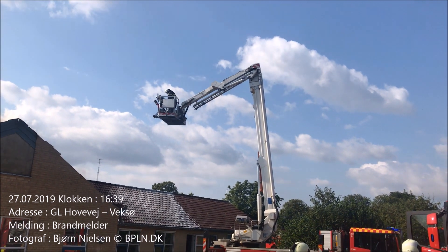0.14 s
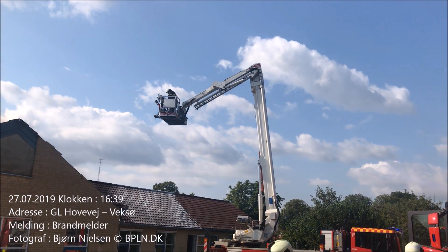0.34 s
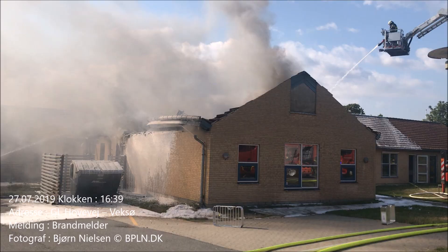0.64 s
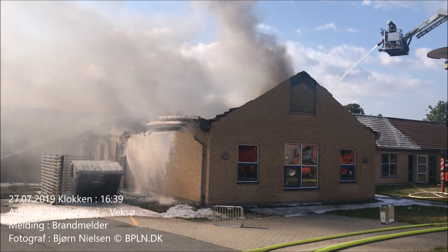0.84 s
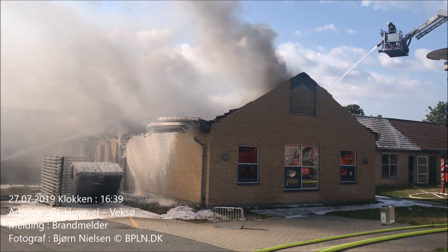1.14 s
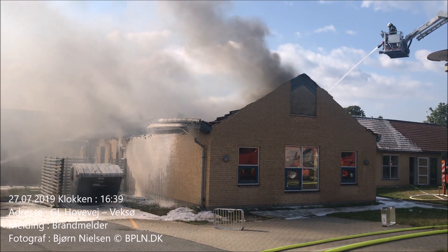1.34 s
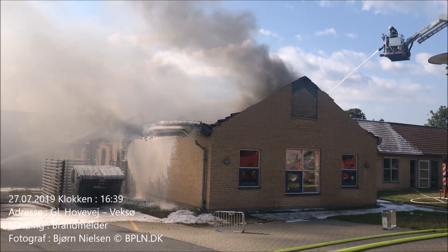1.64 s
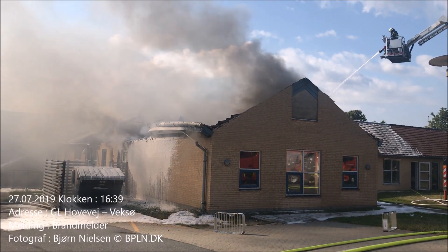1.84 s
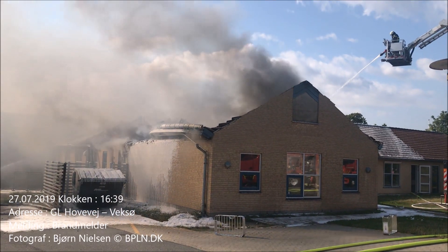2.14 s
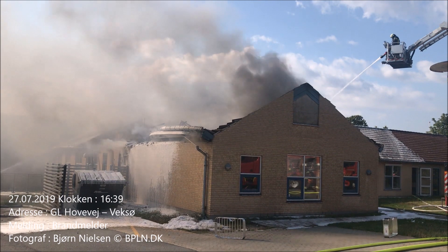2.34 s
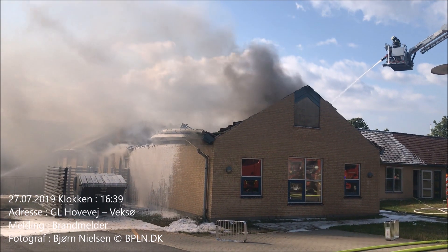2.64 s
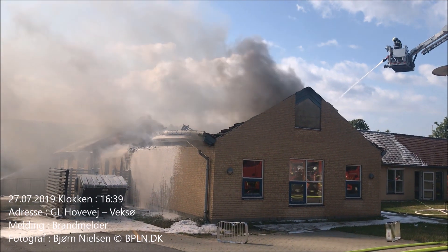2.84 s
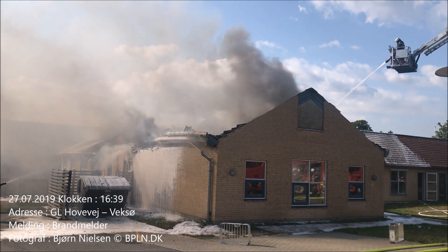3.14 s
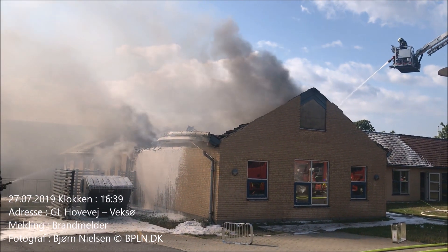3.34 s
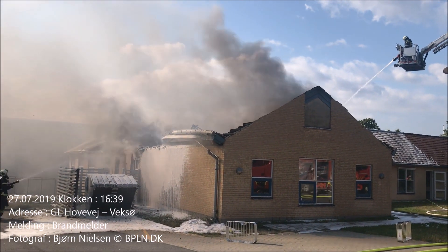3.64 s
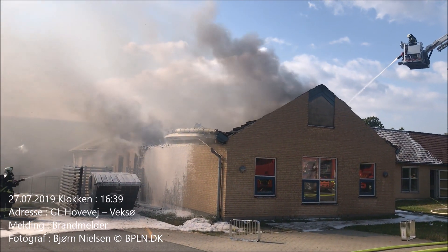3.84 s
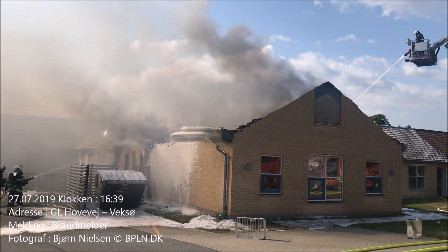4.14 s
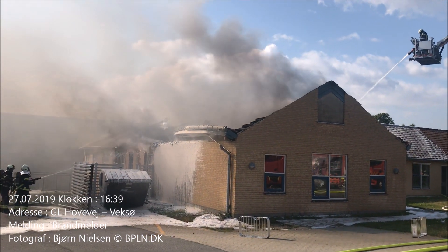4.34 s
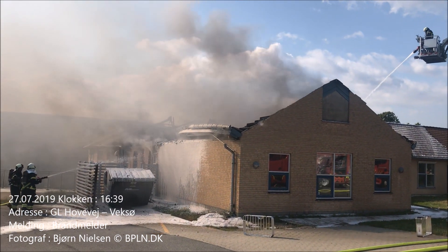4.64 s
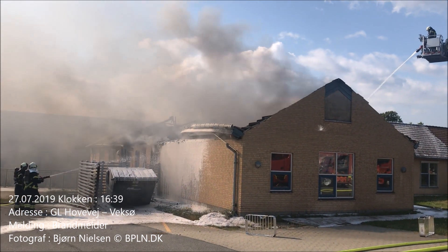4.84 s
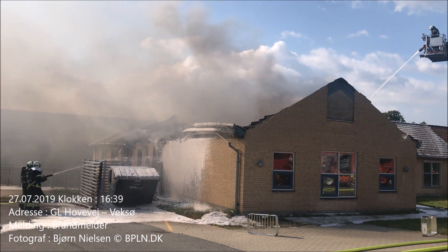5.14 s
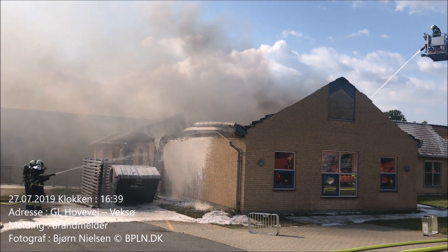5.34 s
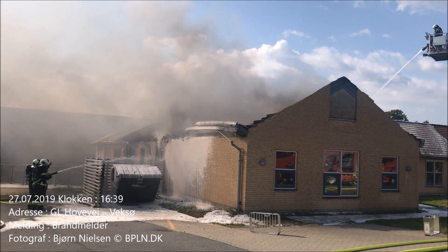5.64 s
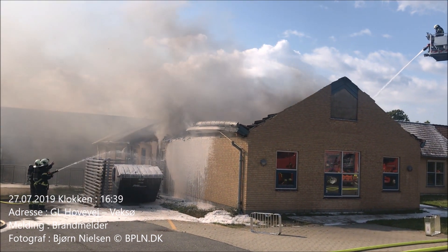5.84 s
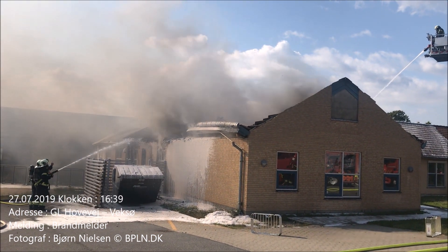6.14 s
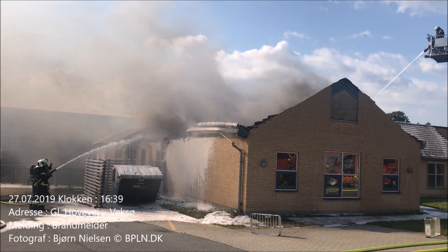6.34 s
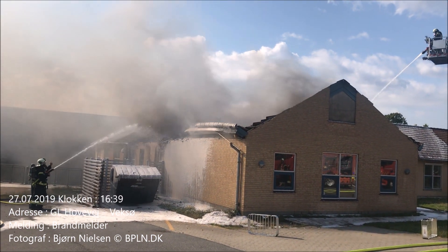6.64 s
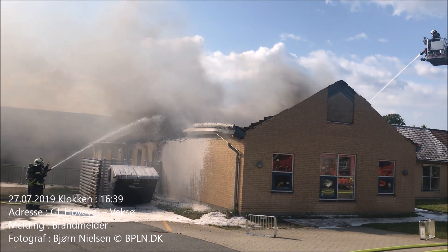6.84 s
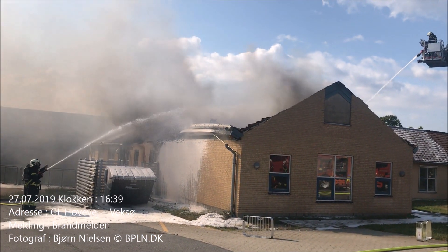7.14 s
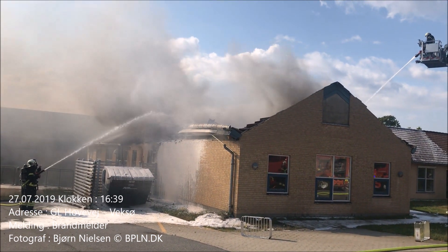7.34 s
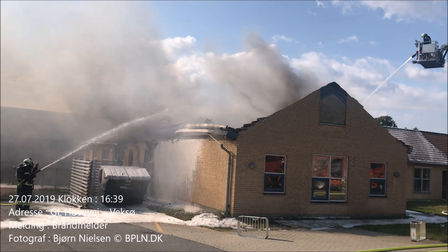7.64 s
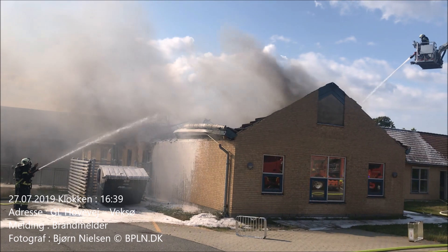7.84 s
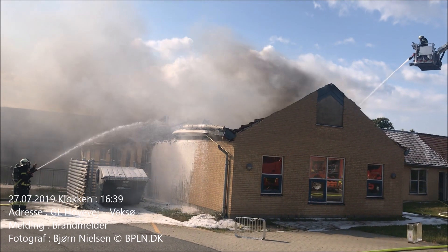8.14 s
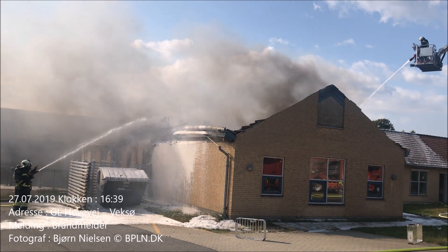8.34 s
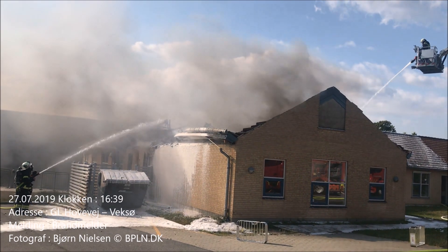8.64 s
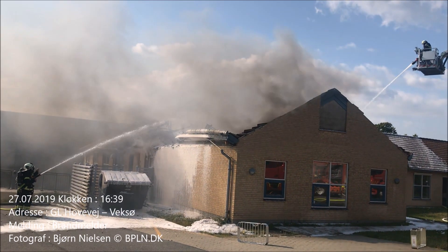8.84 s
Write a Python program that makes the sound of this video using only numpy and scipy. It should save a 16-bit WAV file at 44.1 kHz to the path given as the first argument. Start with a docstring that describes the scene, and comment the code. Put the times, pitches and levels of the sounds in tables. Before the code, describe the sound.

A diesel engine idles and fire pumps drone over a low, fluttering roar throughout, outdoors at a house fire. At first the microphone is beside an aerial ladder truck, whose nozzle sizzles over a faint hydraulic whine and an engine growl. At about 0.7 seconds the sound drops out for an instant and resumes by the house. A hose jet hisses steadily with fine, bright spray, its tone shifting slightly as the nozzle moves, while water lands with a hollow gush. A pump engine revs briefly and sags back several times between 1 and 5.5 seconds. Heavier water slaps down softly near 2.5 and 4.4 seconds. Just past 4 seconds the gush gives way to open splashing and the hiss eases a little. Hiss, splashing and engine throb continue until about 9 seconds, with the pump hum stronger around 7 to 8 seconds.

```python
"""A house fire being fought outdoors, heard on one microphone from two places. First, beside the aerial
ladder: its hydraulic pump whines and its nozzle sizzles. After a brief break at 0.7 s, by the house:
a hose jet hisses, coloured by its bounce off the paving as the nozzle moves, and water gushes hollowly.
Just past 4 s the water swings onto another surface and splashes in the open. Behind it all, a
six-cylinder diesel idles and pumps drone and rev over a low roar."""
import sys
import numpy as np
from scipy import signal
from scipy.fft import rfft, irfft
from scipy.io import wavfile
from scipy.ndimage import uniform_filter1d, map_coordinates

SR = 44100
rng = np.random.default_rng(int(sys.argv[2]) if len(sys.argv) > 2 else 0)


def wav_record(signal):
    """Record a signal, one row per channel, as 16-bit PCM in the file named by sys.argv[1]."""
    frames = np.transpose(np.atleast_2d(signal))
    bounded = np.clip(frames, -1, 1)
    # unit amplitude maps onto the largest positive 16-bit level
    quanta = np.round(bounded * 32767).astype(np.int16)
    wavfile.write(sys.argv[1], SR, quanta)


N = 396900
T = np.arange(N) / SR
BREAK_FROM_S, BREAK_TO_S = 0.7125, 0.7615
FIRING_HZ = 30.01

# spectra of the hose jet and of its fine spray: frequency_hz, relative_db
JET_SPECTRUM = [(500, -44), (1400, -1.5), (2050, -3.5), (2380, 3), (2700, 3.5), (3200, 0), (4000, 2.5),
                (4800, -.5), (5500, -0.5), (6300, -2), (7200, -4.5), (7800, -18), (9000, -17), (15500, -60)]
SPRAY_SPECTRUM = [(3000, -11), (6500, -2), (8000, 0), (9000, -0.5), (9800, -2.5), (10400, -8), (11400, -8),
                  (12500, -11.5), (14000, -17), (16000, -28)]
# the jet's hiss and the spray as the hose is moved about: time_s, relative_db
HISS_LEVEL = [(0.8, -25), (1.3, -26), (2.27, -25), (2.36, -23.5), (2.57, -23.5), (2.63, -25), (3.6, -25),
              (4.63, -31), (5.83, -28.5), (5.94, -31), (6.3, -28), (7.91, -28), (8.22, -30), (8.9, -28.5)]
SPRAY_LEVEL = [(0.78, -43.5), (0.87, -42.5), (1.41, -48.5), (2.39, -45), (3.24, -50.5), (3.39, -45.5),
               (4.51, -52.5), (5.67, -51), (5.7, -52), (7.9, -47), (8.06, -50.5), (8.95, -49.5)]
# how late the bounce off the paving reaches the microphone: time_s, lag_ms
BOUNCE_LAG = [(.3, .594), (.7, .61), (1.5, .602), (1.7, .638), (2.4, .66), (2.8, .657), (3.2, .69),
              (5, .702), (5.8, .724), (6.02, .795), (6.7, .853), (7.4, .813), (9, .765)]
# how much of the sound bounces: time_s, jet_share, spray_share
BOUNCE_SHARES = [(.8, 0.4, 0.2), (1.8, 0.2, 0.35), (2.6, 0.32, 0.4), (3.5, 0.4, 0.1), (4.5, 0.4, 0.4),
                 (5.6, 0.28, 0.2), (5.95, 0.3, .08), (6.5, 0.58, 0.4), (7.4, 0.62, 0.33), (9, 0.43, .22)]
# hollow resonances of the gush: centre_hz, width_hz, relative_db
GUSH_MODES = [(597, 120, 3), (674, 84, -2), (940, 150, -8.5), (1764, 180, -3.5)]
# spectrum of the splash: frequency_hz, relative_db
SPLASH_SPECTRUM = [(200, -4.5), (400, 2.5), (800, -7.5), (1100, 1.5), (1400, 0), (1800, -1), (2100, -6),
                   (3000, -10), (6000, -18), (12000, -56)]
# heavier sheets of water slap down: middle_s, half_length_s, level_db
SLAPS = [(2.52, 0.097, -35), (4.44, 0.014, -29.5)]
# sizzle of the ladder's nozzle: frequency_hz, relative_db
NOZZLE_SPECTRUM = [(1000, 1), (2200, -2.5), (2600, 0), (3600, 3.5), (5000, 2.5), (5700, 2.5), (6500, 4.5),
                   (7200, -1), (7750, -5), (8500, -2), (9200, -10), (9800, -13.5), (12000, -22.5),
                   (15500, -37)]
# overtones of the ladder's hydraulic pump: multiple, level_db
HYDRAULIC_WHINES = [(6, -49), (7, -47), (8, -45), (9, -44.5), (10, -48)]
# resonances of the ladder truck's bodywork: centre_hz, width_hz, relative_db
BODYWORK_MODES = [(268, 95, 0.5), (614, 38, -2.5), (692, 28, -0.5), (790, 46, -7)]
# how hard each cylinder knocks, in firing order: relative_db
CYLINDER_KNOCKS = [1.2, -1.2, 1, -1.5, 1.2, -.7]
# resonances of the engine block: centre_hz, width_hz, relative_db
BLOCK_MODES = [(523.5, 86, 3.5), (687.4, 23.5, 3), (912, 96, 0), (969.5, 86, 1.5), (1470, 550, -12.5)]
# tones of the engine block: firing_multiple, level_db
BLOCK_TONES = [(17.5, -48.5), (18.5, -50), (19.5, -52), (31, -51), (33, -53)]
# the exhaust note: firing_multiple, relative_db
EXHAUST_ORDERS = [(1, -19), (2, -1.5), (4, -20), (5, -12)]
# strength of the exhaust throb: time_s, exhaust_db, third_order_db
THROB_LEVEL = [(.75, -38, -50), (1.15, -31, -29), (1.6, -32, -30), (2.1, -24, -36), (2.45, -36, -39),
               (2.8, -23.5, -43), (3.25, -29, -39), (3.5, -26.5, -32), (4.1, -34, -33), (4.9, -29.5, -36),
               (5.3, -32, -34), (5.6, -26.5, -42), (5.95, -32, -42), (6.4, -30, -40), (7, -33, -42),
               (7.6, -27.5, -42), (8.5, -28.5, -40), (8.8, -24.5, -41)]
# the pump's hum: time_s, level_db
HUM_LEVEL = [(0, -47), (1.3, -43), (2.7, -46), (5, -44), (6.3, -41), (7, -37.5), (8.2, -37), (8.5, -43)]
# a pump engine revs and sags back: top_s, run_up_s, top_hz, third_order_db, second_order_db
REVS = [(1.1, .26, 228, -30.5, -40), (1.89, .86, 233, -29, -35), (2.28, .16, 225, -35, -40),
        (2.55, .2, 227, -34, -38), (4.06, .25, 226, -37, -42), (4.47, .52, 225, -32.5, -38),
        (4.97, .42, 219, -32, -34), (5.33, .4, 231, -40, -31.5)]
# spectrum of the roar: frequency_hz, relative_db
ROAR_SPECTRUM = [(20, -28), (36, -14), (46, -5.5), (75, 0.5), (110, -0.5), (150, -2), (190, -8), (230, -6),
                 (262, -14), (300, -10.5), (345, -22.5), (500, -32), (800, -21.5), (2000, -60)]
# swells and lulls of the deep roar: middle_s, half_length_s, change_db
ROAR_SWELLS = [(.12, .025, 6), (.34, .05, -6), (.48, .04, 7), (.61, .04, -9), (1.22, 0.07, 4),
               (2.14, .1, 2), (2.38, .04, 7), (3.24, .1, -3), (3.45, 0.06, 5), (3.88, .08, -5),
               (4.28, .05, 1.5), (4.37, .03, -5), (4.57, .08, 1.5), (4.81, .02, 3), (4.9, 0.03, 6),
               (5.36, .035, -7), (5.55, 0.054, 2), (6.55, .04, 3.5), (6.7, .2, 2), (7.85, .1, 0.5),
               (8.25, 0.11, 1), (8.53, .035, -7), (8.63, .05, 4.5), (8.88, .1, 1)]
# echoes off the house walls: lag_ms, relative_db
WALL_ECHOES = [(4.7, -15), (11.3, -14), (19.9, -15)]


def hose(hiss_db, lag_ms):
    """By the house: the jet breaks into spray and mist, heard directly and off the paving."""
    surge = walk(33)
    jet = colour(noise(), JET_SPECTRUM) * undb(hiss_db - 0.75 + 0.63 * surge)
    # a bright edge on the hiss, until the nozzle is moved
    jet += band(hz=4820, width_hz=1700) * undb(-34) * (1 - fade(middle_s=2, length_s=0.89))
    spray = colour(drops(per_s=36000, spread_db=1.8), SPRAY_SPECTRUM)
    spray *= undb(curves(SPRAY_LEVEL)[0] + 8.5 + 0.5 * surge + walk(16))
    mist = band(hz=7600, width_hz=1400) * undb(-40) * (1 - fade(middle_s=2.85, length_s=0.28))
    jet_share, spray_share = curves(BOUNCE_SHARES)
    wobble_ms = 0.003 * walk(5)  # the jet wobbles in the firefighter's hands
    bounced = delayed(jet_share * jet + spray_share * (spray + mist), lag_ms + wobble_ms)
    return jet + spray + mist + bounced


def falling_water(hiss_db):
    """Water lands on the house: a hollow gush, giving way to a splash as it swings to another surface."""
    swung = fade(middle_s=4.16, length_s=0.097)
    gush_db = by_place(at_ladder=-37.5, at_house=-34.5 - 12 * swung)
    splash_db = by_place(at_ladder=-50, at_house=(1 - swung) * (hiss_db - 9) - 31 * swung)
    gush = ring(noise(), GUSH_MODES) * undb(gush_db + 0.6 * walk(5.3))
    splash = colour(drops(per_s=7500, spread_db=1.56), SPLASH_SPECTRUM)
    splash *= undb(splash_db + 1.15 * walk(15))
    slaps = band(hz=1460, width_hz=700) * bumps([(s, half_s, undb(db)) for s, half_s, db in SLAPS])
    return gush + splash + slaps


def ladder_truck(lag_ms, pump_hz=224, bounce_share=0.17):
    """Close by: the hydraulics whine, the engine growls, the nozzle sizzles and gains a bounce as it turns."""
    whines = sum(undb(db) * band(k * pump_hz, width_hz=45) for k, db in HYDRAULIC_WHINES)
    throb = orders(FIRING_HZ * T, [(1, -34), (2, -34)], waver_db=0.5)
    growl = ring(noise(), BODYWORK_MODES) * undb(-35)
    turned = fade(middle_s=0.4, length_s=0.25)
    nozzle = colour(noise(), NOZZLE_SPECTRUM) * undb(-27 + 1.06 * walk(24.7))
    mist = band(hz=8800, width_hz=900) * undb(-40) * (1 - turned)
    bounced = bounce_share * turned * delayed(nozzle, lag_ms)
    return whines + throb + growl + mist + nozzle + bounced


def diesel(exhaust_db, third_db, knock_db=-34, decay_s=0.024, cylinders=6):
    """Cylinders fire in turn, each knock ringing the block; the exhaust throbs below."""
    firings = np.cumsum(FIRING_HZ * (1 + 0.00067 * walk(1.48))) / SR
    strength = undb(CYLINDER_KNOCKS)[firings.astype(int) % cylinders]
    blow = strength * np.exp(-(firings % 1) / FIRING_HZ / decay_s)
    # the same parts clatter alike in every engine cycle, with chance on top
    cycle_s = (firings % cylinders) / FIRING_HZ
    clatter = np.interp(cycle_s, T, noise()) + 1.87 * noise()
    knock = ring(blow * clatter, BLOCK_MODES) * undb(knock_db)
    third = orders(firings, [(3, 0)], waver_db=-0.5) * undb(third_db)
    block = orders(firings, BLOCK_TONES, waver_db=2.5)
    exhaust = orders(firings, EXHAUST_ORDERS, waver_db=1.2) * undb(exhaust_db)
    return knock + third + block + exhaust


def pumps():
    """A steady hum, a rough drone that is louder by the ladder, and an engine revving now and then."""
    hum = tone(hz=268.8, wander=.0005, flutter_db=.5) * undb(curves(HUM_LEVEL)[0])
    drone = tone(hz=220.8, wander=.012, flutter_db=1)
    drone *= undb(by_place(at_ladder=-33, at_house=-47) + 1.2 * walk(20))
    return hum + drone + sum(rev(*row) for row in REVS)


def rev(top_s, run_up_s, top_hz, third_db, second_db, rise_hz_per_s=43, sag_hz_per_s=90, attack_s=0.11):
    """A pump engine grows louder as its speed climbs, then sags faster; two orders are heard."""
    release_s = 0.35 * run_up_s
    before_s = np.clip(top_s - T, 0, run_up_s)
    after_s = np.clip(T - top_s, 0, release_s)
    hz = top_hz - rise_hz_per_s * before_s - sag_hz_per_s * after_s
    swell = np.minimum((run_up_s - before_s) / attack_s, 1) * (1 - (after_s / release_s) ** 3)
    third, second = (tone(hz * k / 3, wander=.002, flutter_db=.5) for k in (3, 2))
    effort = undb(.04 * (hz - top_hz) + .8 * walk(20))
    return swell * effort * (undb(third_db) * third + undb(second_db) * second)


def roar(build_s=0.21, deep_hz=140, flutter_db=1.6):
    """Turbulence of engines and fire, louder by the house; only its deep part swells and flutters."""
    built = fade(BREAK_TO_S + build_s / 2, build_s)
    steady = colour(noise(), ROAR_SPECTRUM) * undb(-26.5 + 2.5 * built)
    deep = signal.sosfiltfilt(signal.butter(3, deep_hz, fs=SR, output="sos"), steady)
    return steady - deep + deep * undb(bumps(ROAR_SWELLS) + flutter_db * walk(9))


def wall_echoes(x, drift_ms=0.083):
    """Echoes off the nearby walls; their paths drift a little as the water moves."""
    return sum(undb(db) * delayed(x, lag_ms + drift_ms * walk(0.72)) for lag_ms, db in WALL_ECHOES)


def drops(per_s, spread_db):
    """Random impacts, many small and a few large."""
    sizes = undb(spread_db * np.minimum(rng.exponential(size=N), 5))
    return (rng.random(N) < per_s / SR) * sizes * noise()


def orders(turns, table, waver_db):
    """Sines on multiples of an engine's rate, each wavering in level."""
    return np.sqrt(2) * sum(
        undb(db + waver_db * walk(2.4)) * np.sin(2 * np.pi * (k * turns + rng.random()))
        for k, db in table)


def tone(hz, wander, flutter_db):
    """A sine of rms 1 whose pitch and level waver."""
    phase = 2 * np.pi * np.cumsum(hz * (1 + wander * walk(7.9))) / SR
    return unit(np.sin(phase) * undb(flutter_db * walk(2.4)))


def ring(x, modes):
    """Pass x through resonances, twice each for steep sides; rms 1."""
    rung = 0
    for hz, width_hz, db in modes:
        peak = signal.iirpeak(hz, hz / (1.3 * width_hz), fs=SR)
        rung += undb(db) * signal.lfilter(*peak, signal.lfilter(*peak, x))
    return unit(rung)


def band(hz, width_hz):
    """Noise around one frequency; rms 1."""
    return ring(noise(), [(hz, width_hz, 0)])


def colour(x, spectrum):
    """Shape x with a spectrum; rms 1."""
    hz, db = np.transpose(spectrum)
    bins_hz = np.maximum(np.arange(N // 2 + 1) * SR / N, 1)
    gain = undb(np.interp(np.log(bins_hz), np.log(hz), db))
    return unit(irfft(rfft(x) * gain, N))


def delayed(x, lag_ms):
    """x heard later by a lag that may move."""
    return map_coordinates(x, [(T - lag_ms / 1000) * SR], order=3, mode="mirror")


def by_place(at_ladder, at_house):
    """One value before the break, another after it."""
    return np.where(T < BREAK_FROM_S, at_ladder, at_house)


def curves(rows):
    """Each column of a table of timed rows, one value per sample."""
    time_s, *columns = np.transpose(rows)
    return [np.interp(T, time_s, column) for column in columns]


def fade(middle_s, length_s):
    """A straight ramp from 0 to 1 around middle_s."""
    return np.clip((T - middle_s) / length_s + .5, 0, 1)


def bumps(rows):
    """Bell-shaped rises and dips."""
    return sum(height * np.exp(-((T - s) / half_s) ** 2) for s, half_s, height in rows)


def walk(rate_hz):
    """A random waver at about rate_hz; rms 1."""
    knots_s = np.arange(0, N / SR + 1, 1 / (2 * rate_hz))
    return unit(np.interp(T + rng.random() / 2, knots_s, rng.uniform(-1, 1, len(knots_s))))


def noise():
    """White noise."""
    return rng.standard_normal(N)


def undb(db):
    """Decibels to gain."""
    return 10 ** (np.asarray(db) / 20)


def unit(x):
    """Scale to rms 1."""
    return x / np.sqrt(np.mean(x ** 2))


def scene():
    """One microphone, beside the ladder truck before the break and by the house after it."""
    hiss_db, lag_ms = curves(HISS_LEVEL)[0], curves(BOUNCE_LAG)[0]
    background = diesel(*curves(THROB_LEVEL)) + pumps() + roar()
    near = by_place(ladder_truck(lag_ms), hose(hiss_db, lag_ms)) + falling_water(hiss_db)
    return (background + near + wall_echoes(near))[None]


def record(dry):
    """The microphone's sound drops out at the break; the treble above 15.7 kHz is cut."""
    live = uniform_filter1d(1. * ((T < BREAK_FROM_S) | (T > BREAK_TO_S)), size=40)
    top_cut = signal.ellip(10, .1, 80, 15700, fs=SR, output="sos")
    return signal.sosfilt(top_cut, dry * live)


dry = scene()
out = record(dry)
wav_record(out)
```